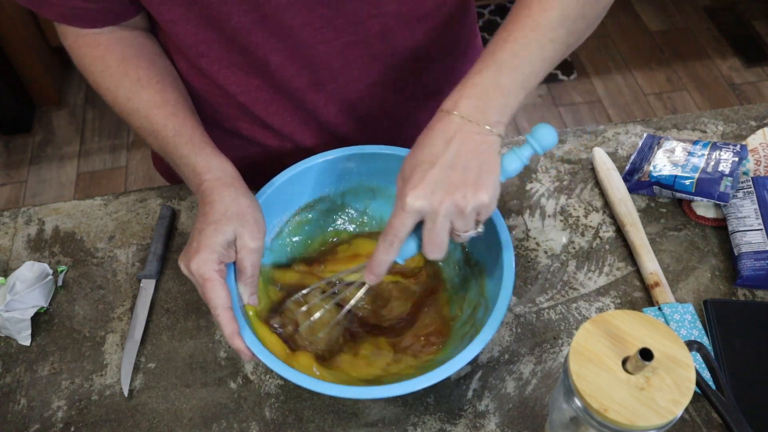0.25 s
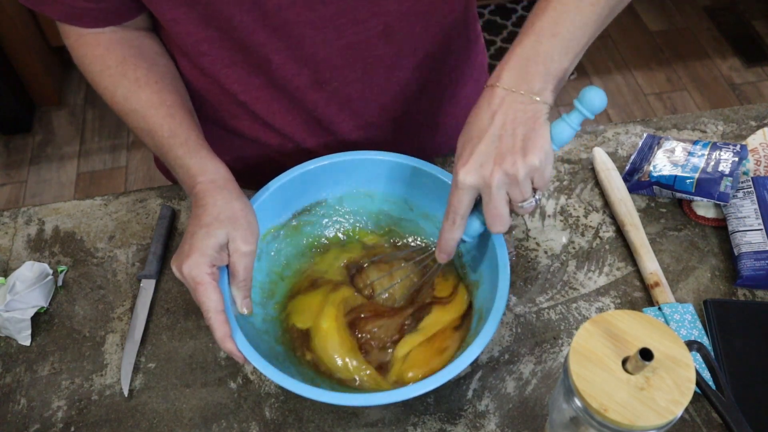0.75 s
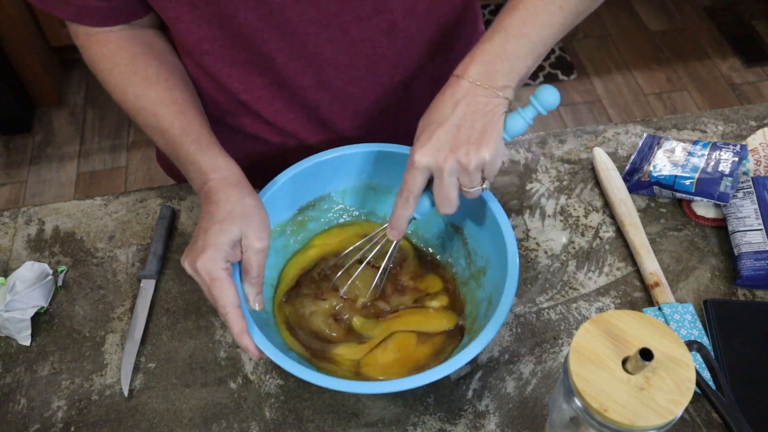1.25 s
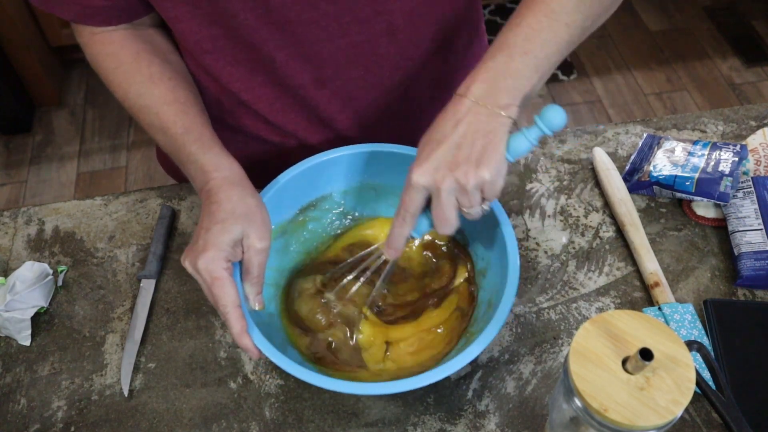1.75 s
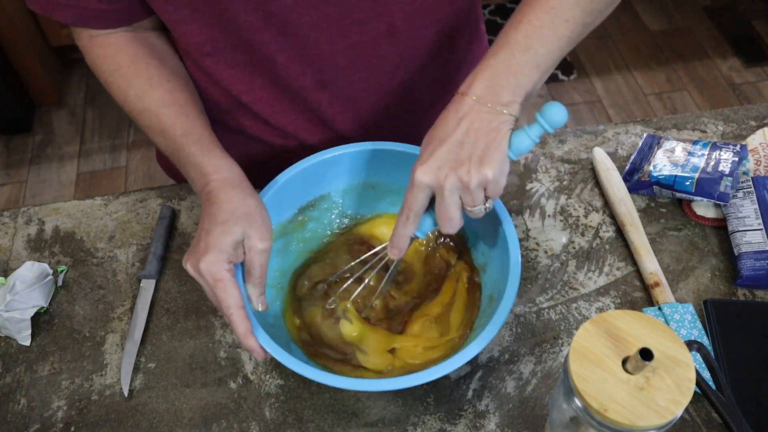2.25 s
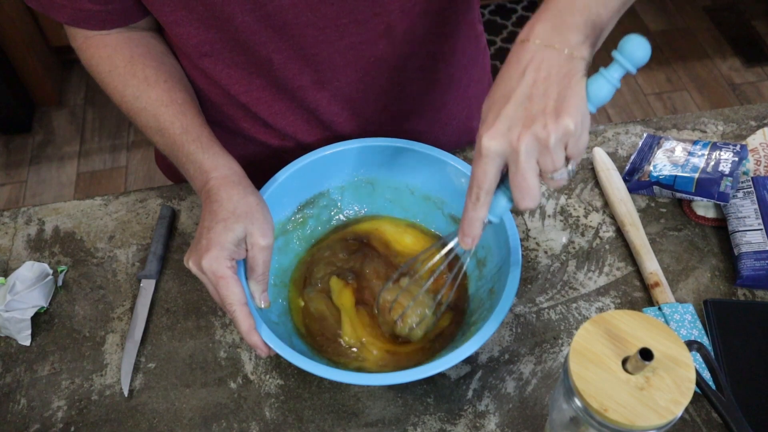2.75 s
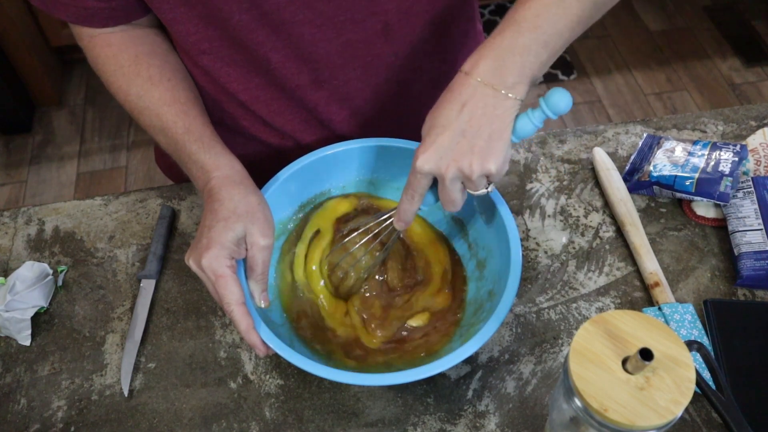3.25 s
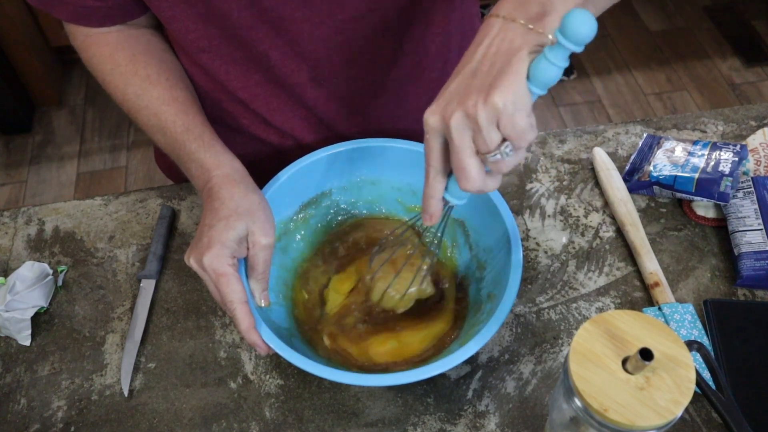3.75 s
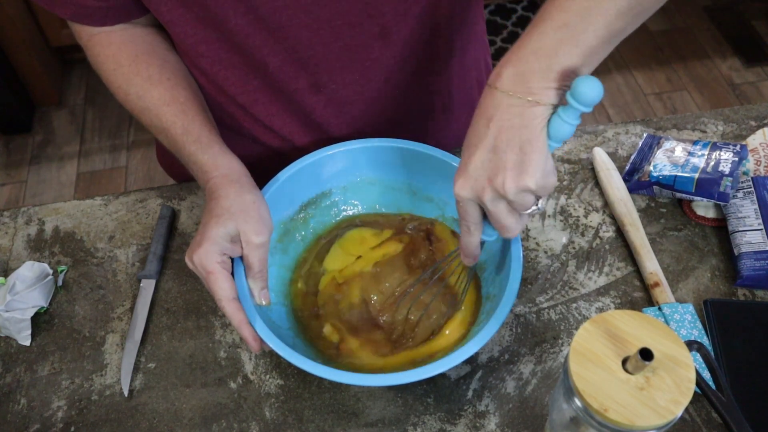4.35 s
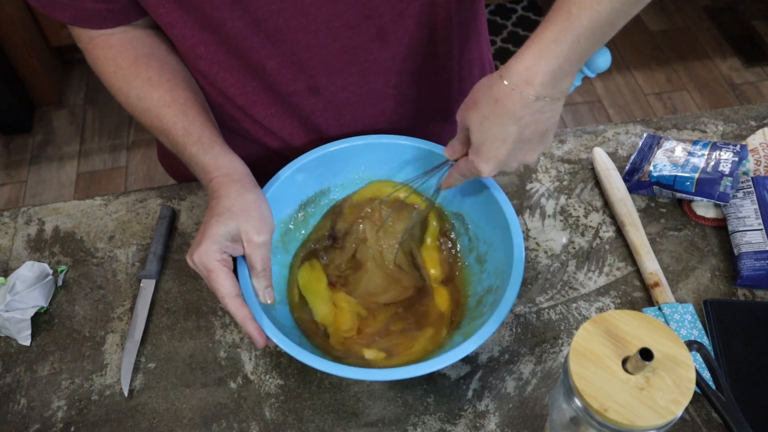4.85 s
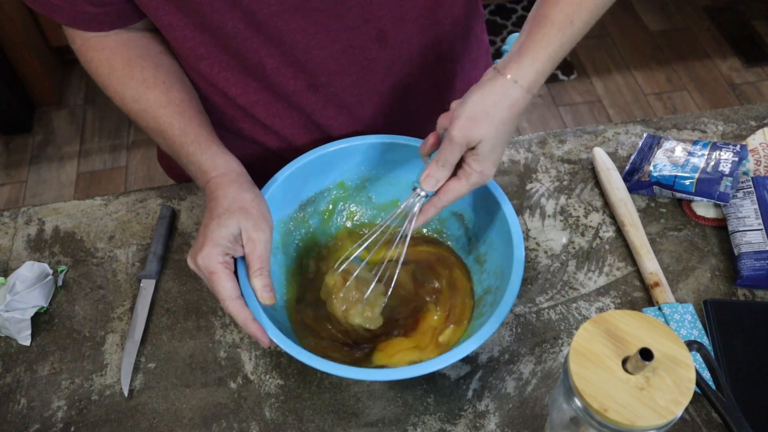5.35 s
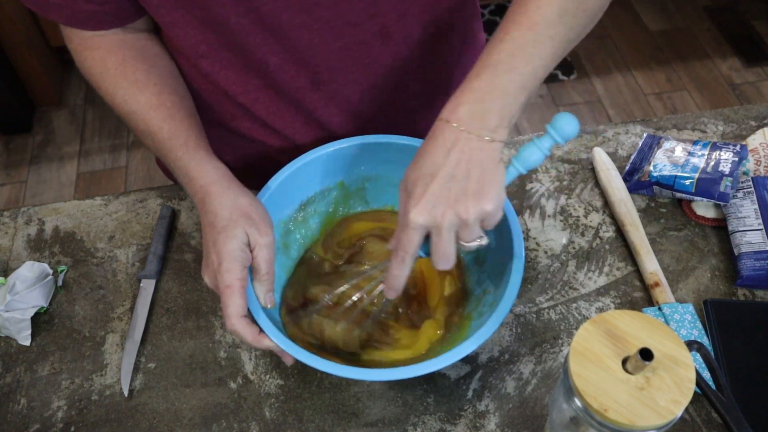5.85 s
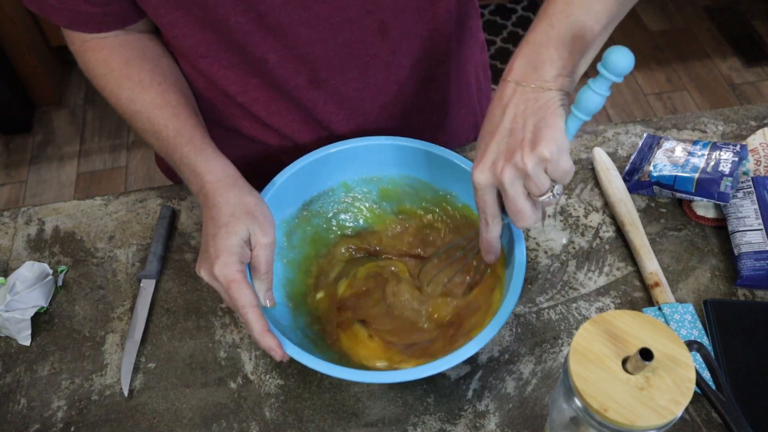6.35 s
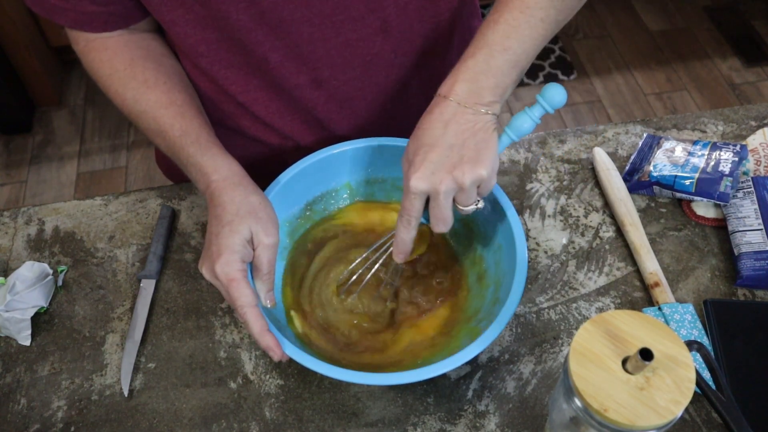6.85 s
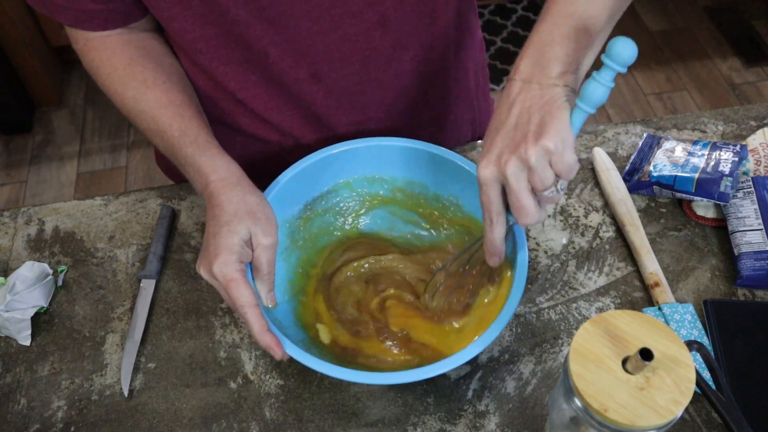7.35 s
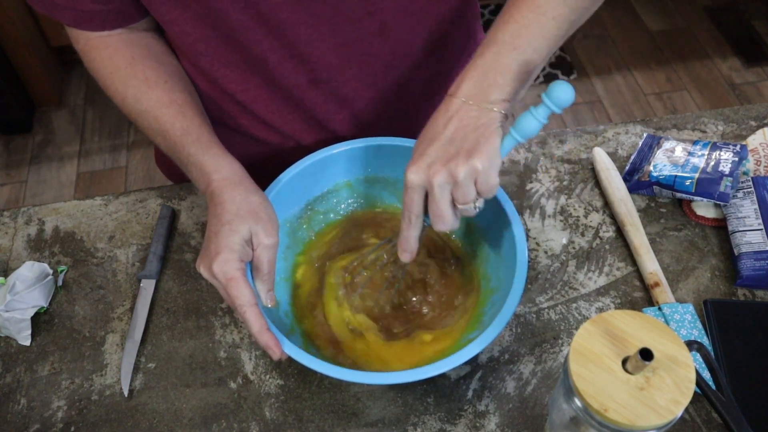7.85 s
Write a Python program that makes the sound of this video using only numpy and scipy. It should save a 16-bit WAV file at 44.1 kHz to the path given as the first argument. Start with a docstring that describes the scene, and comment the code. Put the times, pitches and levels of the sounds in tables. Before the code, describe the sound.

Air and a low motor hum sit beneath a brief whisk stroke, then fuller stirring begins. The plastic bowl gives hollow thocks and a woody low drone as wires drag round it, strongest before three seconds. Afterwards the strokes turn lighter and stickier, with crackles, small bubble pops, wet slaps and sharp wire snaps. A fan ticks faintly farther right. Close stereo microphones, short small-room echo.

```python
"""First heard are moving air, a motor hum and a brief whisk stroke: wires stir eggs into a thick batter.
The plastic bowl stands on a kitchen counter, close to two microphone ports and just left of centre.
Wires rub the wall, which drones, and at first bump it with hollow knocks (filtered impulses, bowl modes).
The sticky batter squelches, pops and crackles: random impulses ringing in small resonances.
Farther off to the right something, probably a fan, ticks once a turn; the small room adds its echo."""
import sys
import numpy as np
from scipy import signal
from scipy.fft import rfft, irfft, next_fast_len
from scipy.io import wavfile

SR = 44100
rng = np.random.default_rng(int(sys.argv[2]) if len(sys.argv) > 2 else 0)


def put_to_file(sound):
    """Save the sound as 16-bit audio at rate SR, in the file named by the first command-line argument."""
    columns = np.atleast_2d(sound).T  # one column per channel
    safe = np.clip(columns, -1, 1)
    whole_steps = np.round(safe * 32767)
    wavfile.write(sys.argv[1], SR, whole_steps.astype(np.int16))


N = 356769
TIME = np.arange(N) / SR

# All levels in the tables are relative; mixing gains follow.
# moving air, spectrum: (frequency [Hz], density [dB per Hz])
AIR = [(20, -45), (35, -1.5), (60, -6), (130, 4.5), (200, -1.5), (350, -2.5), (650, -7), (1000, -10),
       (2000, -15), (4700, -15.5), (8000, -18.5), (12000, -22), (16000, -21)]
# whisk sweeps: (start [s], rise [s], hold [s], release time constant [s],
#   wall drone [dB], squelch [dB], fine crackle [dB])
STROKES = [(0.0, 0.0052, 0.019, 0.042, -60, -59, -51), (0.294, 0.012, 0.1, 0.14, -48, -55, -50),
           (0.505, 0.057, 0.028, 0.28, -50.5, -57, -56.5), (0.76, 0.3, 0.04, 0.35, -43.5, -51, -50.5),
           (1.366, 0.18, 0.16, 0.41, -39, -51, -50), (1.77, 0.024, 0.56, 0.04, -40, -54, -50),
           (2.966, 0.041, 0.024, 0.15, -50.5, -63, -54), (3.168, 0.059, 0.015, 0.13, -50.5, -53.5, -58.5),
           (4.087, 0.013, 0.4, 0.5, -52, -60, -54), (4.716, 0.045, 0.11, .05, -59, -64, -52.5),
           (4.858, 0.02, 0.19, 0.052, -53, -49.5, -45.5), (5.125, 0.028, 0.073, 0.082, -52.5, -58, -55),
           (5.753, 0.14, .03, 0.096, -45, -53, -46), (6.1, 0.13, 0.064, 0.33, -46, -52.5, -45.5),
           (6.376, 0.036, 0.96, 0.22, -51, -62, -58), (7.254, 0.038, 0.17, 0.034, -53.5, -62, -48),
           (7.793, 0.0079, 0.022, 0.15, -43, -50, -47.5)]
# the whisk's drag between sweeps: (wall drone [dB], squelch [dB], fine crackle [dB])
DRAG_DB = [-68.5, -67.5, -66]
# wall under rubbing wires, spectrum: (frequency [Hz], density [dB per Hz])
RUB = [(40, -36), (110, -26), (180, -0.5), (300, -4), (430, -3), (660, 7), (900, -19.5), (1300, -11),
       (2500, -54.5), (8000, -57)]
# bowl with its batter, modes: (frequency [Hz], level [dB], t60 [s])
BOWL = [(89, -17, 0.36), (124.6, 5.5, 0.17), (156, -28, 0.1), (220, -19, 0.4), (285.7, 1.5, 0.076),
        (361, -6.5, 0.068), (428, -5.5, 0.054), (498.4, -1.5, 0.14), (580, -11, 0.26), (665.5, -0.5, 0.085),
        (703, -8, 0.047), (782, -21.5, 0.32), (1016, -16, 0.12), (1104, -24, 0.11)]
# batter pockets, spectrum: (frequency [Hz], density [dB per Hz])
SQUELCH = [(400, -38), (900, 4.5), (1250, 2.5), (1550, -1.5), (2100, 4), (2700, -4), (3500, 3.5),
           (7000, -24)]
# batter threads, spectrum: (frequency [Hz], density [dB per Hz])
CRACKLE = [(1200, -24), (2600, -9), (3250, -7), (4200, 0.5), (5300, -4.5), (6600, -4), (7800, 0),
           (9500, -4.5), (12000, -6), (16000, -15)]
# resonant gaps between the coated wires: (centre [Hz], width [Hz], level [dB])
GAPS = [(3330, 230, -14), (4230, 100, -12.5), (5380, 320, -10)]
# fan tick, spectrum: (frequency [Hz], density [dB per Hz])
TICK = [(1000, -25), (2600, -14), (3200, -3), (3800, -7), (4900, 0), (6300, -7), (8400, -2), (9800, -13),
        (16000, -26)]
# fan tick, ringing: (frequency [Hz], level [dB], t60 [s])
TICK_MODES = [(3140, -3, .035), (4500, -3, .04), (4970, 0, .04), (7240, -5, .04), (8310, -3, .04),
              (8840, -4, .04)]
# whisk bumps the bowl: (time [s], level [dB], contact hardness as low-pass cutoff [Hz],
#   extra deep thud [dB], thock pitch [Hz], thud pitch [Hz])
KNOCKS = [(0.311, -26.5, 1000, 2.5, 453, 121), (0.367, -27, 170, 12, 650, 103),
          (0.4774, -13.5, 680, -1.5, 637, 106), (0.9264, -18, 895, -11, 627, 114),
          (0.947, -14.5, 140, 2, 650, 98), (1.1540, -11, 930, -2, 697, 128),
          (1.1804, -3.5, 1100, -2, 620, 113), (1.3763, -30, 704, 11.5, 646, 121),
          (1.4756, -23, 970, 8, 680, 118.4), (1.5093, -7, 710, -0.5, 633, 121),
          (1.6803, -19.5, 607, 5.5, 660, 111.4), (1.9620, -12, 780, 3.5, 686, 122),
          (2.1308, -22, 833, -5, 606, 123.5), (2.167, -18, 895, -5, 660, 122),
          (2.5562, -13, 815, 5, 714, 118.3)]
# hollow thock, spectrum: (frequency [Hz], density [dB per Hz])
THOCK = [(60, -55), (200, -5), (400, -17.5), (650, 6.5), (850, -10.5), (1200, -8.5), (1700, -24),
         (4000, -73)]
# bending waves in the wall, spectrum: (frequency [Hz], density [dB per Hz])
BENDING = [(40, -21), (70, -15.5), (110, -7), (170, -10.5), (275, 3), (400, -5), (600, -2.5), (1000, -33),
           (4000, -44)]
# batter smacks the wall: (time [s], level [dB], centre [Hz], spread [octaves, 1/e at twice this],
#   wall's answer [dB], air pocket pitch [Hz], air pocket [dB])
SMACKS = [(.313, -29.5, 5000, 7.4, -52, 1750, -41), (.4185, -35.5, 3700, 2.4, -41, 3450, -38),
          (.585, -45, 3540, .9, -38, 3260, -55), (.8224, -42, 4900, 1.3, -40, 4170, -56),
          (2.316, -39, 4000, 2, -45, 3650, -43), (3.009, -39, 1890, 0.77, -48, 2270, -38.5),
          (3.0145, -31.5, 3500, 3.4, -43, 1280, -39), (4.976, -32, 8000, 1.5, -60, 3720, -44),
          (4.982, -29, 7200, 1.4, -54, 1040, -44), (5.131, -36.5, 3020, 2.6, -58, 1900, -41.5),
          (5.199, -51, 2500, 1.4, -58, 1350, -45), (5.5254, -46, 680, 0.4, -45, 1110, -55),
          (5.8746, -27, 4250, 1.1, -37, 1320, -35), (5.9716, -35.5, 6000, 1.5, -57, 1100, -42),
          (6.171, -43, 2780, .83, -44, 2510, -41), (6.189, -34.5, 6000, 1.6, -39.5, 2520, -47),
          (6.2125, -36, 3200, 2, -39, 2550, -38.5), (6.225, -53, 2500, .8, -35.5, 2130, -44),
          (6.278, -46, 2280, 0.83, -35, 2180, -36), (6.3679, -43, 4270, 1.2, -37, 3900, -41),
          (6.454, -51, 2380, 0.48, -44.5, 2090, -61), (6.580, -47, 4000, 1.1, -39, 3500, -50),
          (7.175, -38, 6500, 1.6, -45, 4030, -52), (7.216, -40.5, 5500, 1.2, -52, 4600, -51),
          (7.2735, -33, 3300, 0.66, -34, 1980, -32), (7.7995, -34, 5500, 5.3, -48, 910, -37),
          (7.855, -36.5, 3000, 1.6, -51, 1870, -36.5), (7.977, -43.5, 1100, .57, -59, 1550, -59)]
# batter tears open behind a wire: (time [s], length [s], level [dB],
#   resonance at the start [Hz], at the end [Hz])
SLURPS = [(0.884, 0.037, -53, 2440, 2240), (0.961, 0.034, -55, 4640, 4140), (1.012, 0.046, -56, 3900, 3300),
          (1.237, 0.044, -51.5, 3330, 4300), (1.31, 0.041, -53, 2470, 2230),
          (1.598, 0.083, -51, 1910, 1670), (2.161, 0.053, -51.5, 3470, 3950),
          (1.792, 0.1, -51.5, 3400, 3200), (1.833, 0.032, -47.5, 9300, 8900),
          (2.085, 0.025, -52, 5200, 4800), (5.792, 0.16, -55, 4100, 4400), (5.87, 0.054, -58, 1400, 1150),
          (6.283, .085, -54.5, 2230, 2230), (7.295, 0.053, -56, 2320, 2070),
          (7.342, 0.036, -56, 4000, 3600), (7.979, 0.032, -54.5, 1800, 1200)]
# wires snap together: (time [s], level [dB], centre [Hz], spread [octaves, 1/e at twice this],
#   wall's answer [dB])
WIRE_CLICKS = [(1.0905, -31, 2380, .42, -29.5), (1.155, -31, 2430, 0.33, -43),
               (2.556, -40.5, 2490, 0.87, -60), (2.897, -36, 6600, 0.56, -65),
               (2.9, -16.5, 9300, 0.97, -46), (2.906, -25, 9700, 0.2, -52), (4.766, -35, 7340, .5, -67),
               (4.817, -39, 4100, 0.23, -58), (4.8706, -21, 7100, 0.76, -57), (4.8875, -26, 4200, 2.5, -58),
               (4.942, -40, 3000, 0.35, -65), (5.0854, -27.5, 5200, 0.099, -45),
               (5.263, -32, 8100, .3, -64), (5.656, -33.5, 5000, 0.76, -60), (6.223, -18, 7700, 0.061, -51),
               (7.086, -32, 5340, 0.53, -41), (7.101, -38, 5300, 0.67, -41), (7.382, -37, 6500, 0.73, -53)]
# wires ringing on: (frequency [Hz], level [dB], t60 [s])
WIRE_MODES = [(8450, -57, .16), (8610, -58, .13), (10210, -59, .13), (10480, -61, .11)]
# fall of the clicks in the highest treble: (frequency [Hz], gain [dB])
CLICK_TOP = [(1000, 0), (10800, 0), (12000, -6), (16000, -8)]
# treble the room swallows from the clicks: (frequency [Hz], gain [dB])
ECHO_TOP = [(6000, 0), (10500, -2), (12000, -6), (16000, -8)]
# the kitchen's reverberation: (frequency [Hz], t60 [s])
ROOM_T60 = [(100, 0.24), (700, 0.39), (4000, 0.2), (14000, 0.16)]

FAN_FIRST_S, FAN_TURN_S = .0725, .2243
TICK_UNEVEN_DB, MODE_UNEVEN_DB = 1, 1.5
TIRE_DB_PER_S = 1.5   # a sweep loses force as it goes
WALL_LAW = 0.75   # the wall's drone grows as this power of the force
WALL_NOTE_HZ = 652   # the note that a lightly touched wall gives
THOCK_HZ, THUD_HZ = 650, 121.7   # reference pitches
WIRE_S, WIRE_CRACK = .0011, .55   # burst scale; share of one sharp crack
SMACK_S = .0034   # burst scale
CUTOFF_HZ = 15950


def from_db(db):
    """Decibels to gain."""
    return 10 ** (np.asarray(db) / 20)


def rms_one(x):
    """Scale to rms 1."""
    return x / np.sqrt(np.mean(x ** 2) + 1e-20)


def at_hz(points, hz):
    """Read a table on a log-frequency axis."""
    table = np.array(points)
    return np.interp(np.log(np.maximum(hz, 1)), np.log(table[:, 0]), table[:, 1])


def add(track, s, sound):
    """Mix a sound into a track at time s."""
    start = max(round(s * SR), 0)
    track[start:start + len(sound)] += sound[:N - start]


def response(spectrum, size=4096):
    """Causal (minimum-phase) impulse response with the given spectrum."""
    gain = from_db(at_hz(spectrum, np.fft.rfftfreq(size, 1 / SR)))
    cepstrum = irfft(np.log(gain))
    cepstrum[1:size // 2] *= 2
    cepstrum[size // 2 + 1:] = 0
    return irfft(np.exp(rfft(cepstrum)))


def colour(x, spectrum):
    """Filter a signal with a spectrum."""
    return signal.oaconvolve(x, response(spectrum))[:len(x)]


def ring(x, modes):
    """Parallel damped modes; a unit click sets each ringing at its own level."""
    out = 0
    for hz, db, t60 in modes:
        r, w = from_db(-60 / (t60 * SR)), 2 * np.pi * hz / SR
        zeros, poles = [1, -r * np.cos(w)], [1, -2 * r * np.cos(w), r * r]
        out = out + from_db(db) * signal.lfilter(zeros, poles, x + 1e-18)
    return out


def grains(per_s, spread_db):
    """Random tiny impulses of uneven size and sign."""
    sizes = from_db(spread_db * np.minimum(rng.exponential(1, N), 4))
    return sizes * rng.standard_normal(N) * (rng.random(N) < per_s / SR)


def random_path(per_s):
    """Straight lines between random values, per_s of them a second."""
    knots = rng.standard_normal(4096)
    return np.interp(TIME * per_s, np.arange(len(knots)), knots)


def flutter(per_s, depth_db):
    """A gain that wanders at random."""
    return from_db(depth_db * random_path(per_s))


def wander(hz, per_s, octaves):
    """A pitch that strays at random around its centre."""
    return hz * 2 ** (octaves * random_path(per_s))


def resonate(x, hz, width_hz):
    """One resonance whose centre moves; rms 1."""
    turning = np.exp(2j * np.pi * np.cumsum(hz) / SR)
    pole = np.exp(-np.pi * width_hz / SR)
    return rms_one((turning * signal.lfilter([1], [1, -pole], x / turning + 1e-18)).real)


def diffuse(size):
    """White noise arriving from all sides: alike at both ports in the bass, less so higher up."""
    mid, side = rfft(rng.standard_normal((2, size)))
    alike = .2 + .77 / (1 + (np.fft.rfftfreq(size, 1 / SR) / 300) ** 3)
    return irfft(np.sqrt((1 + alike) / 2) * mid + np.sqrt((1 - alike) / 2) * side * [[1], [-1]], size)


def fan_air(air_db=-51.5, hum_hz=122.0, hum_db=-63.0):
    """A steady rush of air from all sides and a motor hum that wavers in level."""
    sides = diffuse(next_fast_len(N))[:, :N]
    air = rms_one(np.array([colour(side, AIR) for side in sides]))
    hum = np.sqrt(2) * np.sin(2 * np.pi * hum_hz * TIME) * flutter(per_s=9, depth_db=3.5)
    return from_db(air_db) * air + from_db(hum_db) * hum


def sweeps():
    """Each sweep builds up, holds and dies away; returns the gains of drone, squelch and crackle."""
    power = from_db(DRAG_DB)[:, None] ** 2
    for start, rise, hold, release, wall_db, squelch_db, crackle_db in STROKES:
        t = np.maximum(TIME - start, 0)
        fading = np.exp(-np.maximum(t - rise - hold, 0) / release)
        force = np.minimum(t / rise, 1) * from_db(-TIRE_DB_PER_S * t) * fading
        wall = from_db(wall_db) * force ** WALL_LAW
        power = power + np.array([wall, from_db(squelch_db) * force, from_db(crackle_db) * force]) ** 2
    return np.sqrt(power)


def rubbed_wall(drone, ring_share_db=0, note_db=-3.0, note_width_hz=50, hard_db=-40, drone_db=-3.5):
    """Wires slip along the wall: a light touch favours its note, a hard one shakes the whole bowl."""
    slips = grains(per_s=1800, spread_db=2.5)
    ringing = rms_one(ring(slips, BOWL))
    whole_bowl = rms_one(rms_one(colour(slips, RUB)) + from_db(ring_share_db) * ringing)
    note_hz = wander(WALL_NOTE_HZ, per_s=9, octaves=.025)
    note = from_db(note_db) * resonate(slips, note_hz, note_width_hz)
    pressure = np.minimum(drone / from_db(hard_db), 1) ** 0.073
    return from_db(drone_db) * drone * (pressure * whole_bowl + note)


def bubbles(per_s, cycles, patchy_db, low_hz, high_hz, count=16):
    """Tiny pockets snap open and ring a few cycles; each size comes in flurries of its own."""
    out = 0
    for hz in np.geomspace(low_hz, high_hz, count):
        snaps = grains(per_s / count, spread_db=1.5) * flutter(per_s=38, depth_db=patchy_db)
        out = out + np.sqrt(hz) * rms_one(ring(snaps, [(hz, 0, cycles / hz)]))   # t60 of so many cycles
    return out


def stirred_batter(squelch, crackle, squelch_db=-1, crackle_db=-1):
    """Threads and small bubbles of batter snap behind the wires, whose gaps resonate."""
    clumps = flutter(per_s=170, depth_db=3.2)
    large = bubbles(per_s=2200, cycles=22.0, patchy_db=4.5, low_hz=840, high_hz=3600)
    pockets = rms_one(clumps * colour(large, SQUELCH))
    fine = bubbles(per_s=6000, cycles=19, patchy_db=0, low_hz=2540, high_hz=13100)
    threads = rms_one(clumps * colour(fine, CRACKLE))
    for hz, width_hz, db in GAPS:
        snaps = grains(per_s=380, spread_db=2)
        gap_hz = wander(hz, per_s=12, octaves=0.072)
        threads = threads + from_db(db) * resonate(snaps, gap_hz, width_hz)
    return from_db(squelch_db) * squelch * pockets + from_db(crackle_db) * crackle * threads


def fan_tick(rub_s=0.0088, tick_db=-60.5):
    """Once a turn a loose part chatters for a few milliseconds; every other turn it comes a little late."""
    chatter = np.zeros(N)
    t = np.arange(2048) / SR
    for turn, s in enumerate(np.arange(FAN_FIRST_S, N / SR, FAN_TURN_S)):
        burst = rng.standard_normal(len(t)) * np.minimum(t / 0.001, 1) * np.exp(-t / rub_s)
        uneven = from_db(TICK_UNEVEN_DB * rng.standard_normal())
        add(chatter, s + 0.0032 * (turn % 2 - .5), uneven * burst)
    rattle, ringing = rms_one(colour(chatter, TICK)), rms_one(ring(chatter, TICK_MODES))
    return from_db(tick_db) * rms_one(rattle + .5 * ringing)


def bending_wave(wave_db=29, bend_hz=260, count=22, size=16384):
    """Bending waves in the soft wall travel slower the deeper they are: a chain of all-passes."""
    pole = np.exp(-2 * np.pi * bend_hz / SR)
    impulse = colour(signal.unit_impulse(size), BENDING)
    return from_db(wave_db) * signal.sosfilt([[-pole, 1, 0, 1, -pole, 0]] * count, impulse)


def knocks(ring_db=-15, thock_db=28, slow_hz=320, deep_hz=170, detune=0.012, size=16384):
    """A bump gives a hollow thock and rings the bowl; its slow, deep modes need a few cycles to swell."""
    out, t = np.zeros(N), np.arange(size) / SR
    hz, mode_db, t60 = np.transpose(BOWL)[:, :, None]
    swell = 1 - np.exp(-(t * hz / (slow_hz / hz)) ** 2)
    deep = hz < deep_hz
    wave = bending_wave(size=size)
    for s, db, hard_hz, thud_db, thock_hz, thud_hz in KNOCKS:
        thock_spectrum = np.array(THOCK) * [thock_hz / THOCK_HZ, 1]
        thock = from_db(thock_db) * colour(signal.unit_impulse(size), thock_spectrum)
        pitch = hz * np.where(deep, thud_hz / THUD_HZ, 1)   # grip and load retune the deep modes
        # the batter and the point of contact keep moving
        strength, shift = rng.standard_normal((2, len(BOWL), 1))
        start_db = mode_db + MODE_UNEVEN_DB * strength + thud_db * deep
        decay = from_db(start_db - 60 * t / t60)
        modes = decay * swell * np.sin(2 * np.pi * pitch * (1 + detune * shift) * t)
        bump = thock + from_db(thud_db / 2) * wave + from_db(ring_db) * modes.sum(0)
        contact = signal.butter(2, hard_hz, fs=SR, output="sos")
        add(out, s, from_db(db) * signal.sosfilt(contact, bump))
    return out


def click(db, centre_hz, octaves, length, wall_db, crack=0, answer_s=0.0036, skirt_db=-19, size=4096):
    """A burst of slips and one sharp crack, bright around its pitch; the wall answers with its note."""
    t = np.arange(size) / SR
    hz = np.geomspace(200, 16000, 80)
    answer = t / answer_s * np.exp(1 - t / answer_s) * np.sin(2 * np.pi * WALL_NOTE_HZ * t)
    slips = rng.laplace(size=size) * np.exp(-(t / length - 1) ** 2)
    sharp = signal.unit_impulse(size, round(length * SR / 2))
    burst = (1 - crack) * slips / np.linalg.norm(slips) + crack * sharp
    away = np.log2(hz / centre_hz)
    hump = np.exp(-(away / (2 * octaves)) ** 2) + from_db(skirt_db) / (1 + away ** 2)
    snap = colour(burst, np.c_[hz, 20 * np.log10(hump)])
    snap = np.sqrt(length * SR) * snap / np.linalg.norm(snap)
    return from_db(db) * snap + from_db(wall_db) * answer


def pop(db, hz, swell_s=0.0018, rise_per_s=6, size=1024):
    """An air pocket opens and rings briefly, rising in pitch."""
    t = np.arange(size) / SR
    swell = t / swell_s * np.exp(1 - t / swell_s)
    return from_db(db) * swell * np.sin(2 * np.pi * hz * t * (1 + rise_per_s * t / 2))


def batter_smacks():
    """Wet batter smacks the wall, and each smack pops an air pocket."""
    out = np.zeros(N)
    for s, db, hz, octaves, wall_db, pocket_hz, pocket_db in SMACKS:
        add(out, s - SMACK_S / 2, click(db, hz, octaves, SMACK_S, wall_db, crack=0.39))
        add(out, s, pop(pocket_db, pocket_hz))
    return colour(out, CLICK_TOP)


def slurps(snaps_per_s=1300, width_hz=380):
    """A wire tears a hollow in the batter: tiny snaps ring in it while its size changes."""
    out = np.zeros(N)
    for s, length, db, start_hz, end_hz in SLURPS:
        size = int(length * SR)
        snaps = grains(snaps_per_s, spread_db=0.5)[:size] * np.sin(np.linspace(0, np.pi, size))
        add(out, s, from_db(db) * resonate(snaps, np.geomspace(start_hz, end_hz, size), width_hz))
    return out


def wire_clicks():
    """Wires snap against each other with short dry clicks and ring on faintly."""
    out = np.zeros(N)
    for s, db, hz, octaves, wall_db in WIRE_CLICKS:
        snap = click(db, hz, octaves, WIRE_S, wall_db, crack=WIRE_CRACK, answer_s=0.0017)
        add(out, s - WIRE_S / 2, snap)
    return colour(out + ring(out, WIRE_MODES), CLICK_TOP)


def place(x, lead_us, pan_db):
    """Two close microphone ports; positive lead and pan favour the left."""
    size = next_fast_len(N + 64)
    delay = np.exp(-2j * np.pi * np.fft.rfftfreq(size, 1 / SR) * lead_us / 1e6)
    right = irfft(rfft(x, size) * delay, size)[:N]
    return np.array([x * from_db(pan_db / 2), right * from_db(-pan_db / 2)])


def kitchen(x, size=20000):
    """Reverberation: diffuse reflections build up, then die away octave by octave."""
    t, hz = np.arange(size) / SR, np.fft.rfftfreq(size, 1 / SR)
    noise, tail = rfft(diffuse(size)), 0
    centres = np.geomspace(100, 12800, 8)
    for centre, share in zip(centres, np.eye(len(centres))):
        decay = from_db(-60 * t / at_hz(ROOM_T60, centre))
        shape = decay * np.clip((t - .003) / 0.0011, 0, 1)   # the first reflections come after 3 ms
        band = irfft(noise * at_hz(np.c_[centres, share], hz), size)
        tail = tail + band * shape / np.linalg.norm(shape)
    return signal.oaconvolve(x[None], tail, axes=1)[:, :N]


def scene(bowl_room_db=-9, batter_room_db=-6, click_room_db=-8, fan_room_db=-3):
    """The bowl is close, just left of centre; the fan's tick is farther off to the right."""
    air = fan_air()
    rub, squelch, crackle = sweeps()
    drone = rubbed_wall(rub)
    batter = stirred_batter(squelch, crackle) + slurps()
    tick = fan_tick()
    bowl = drone + knocks()
    snaps = batter_smacks() + wire_clicks()
    near = place(bowl + batter + snaps, lead_us=38, pan_db=-.3)
    far = place(tick, lead_us=-35, pan_db=-7)
    to_room = from_db(bowl_room_db) * bowl + from_db(batter_room_db) * batter
    to_room = to_room + from_db(click_room_db) * colour(snaps, ECHO_TOP) + from_db(fan_room_db) * tick
    return near + far + kitchen(to_room) + air


def record(dry):
    """The top is cut steeply."""
    return signal.sosfilt(signal.ellip(10, .1, 70, CUTOFF_HZ, fs=SR, output="sos"), dry)


dry = scene()
out = record(dry)
put_to_file(out)
```